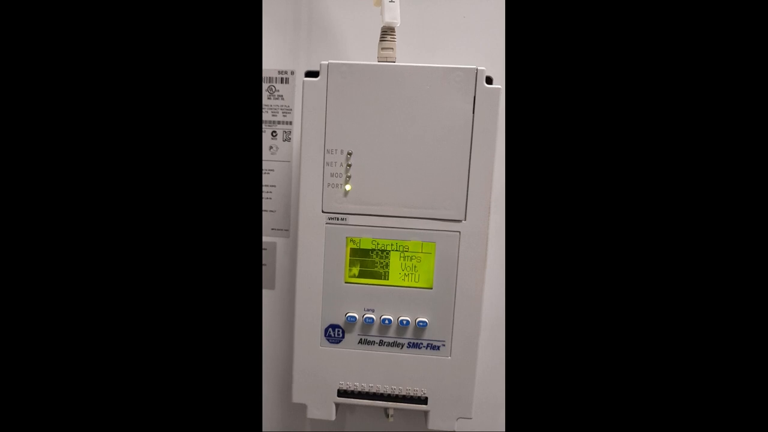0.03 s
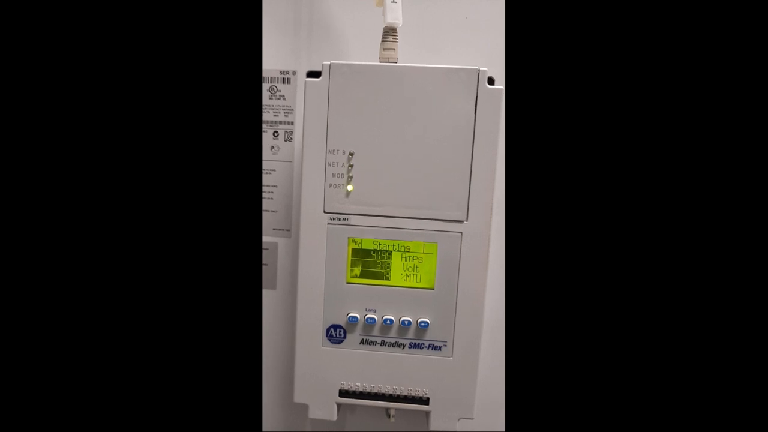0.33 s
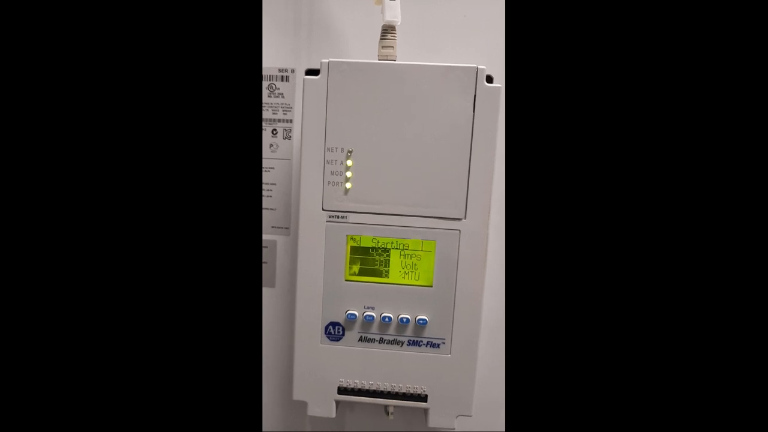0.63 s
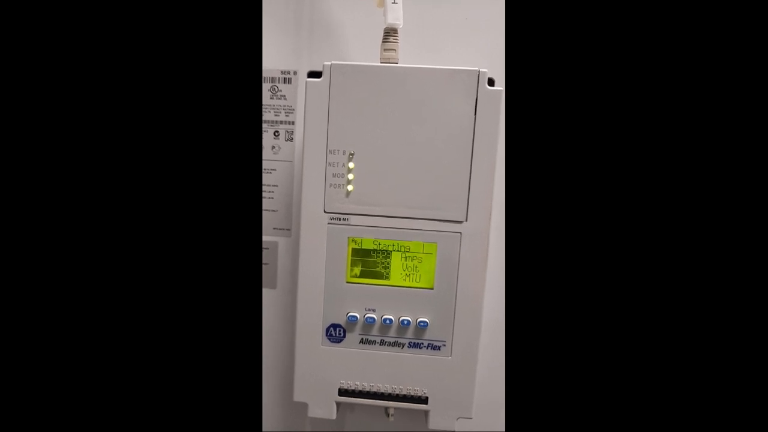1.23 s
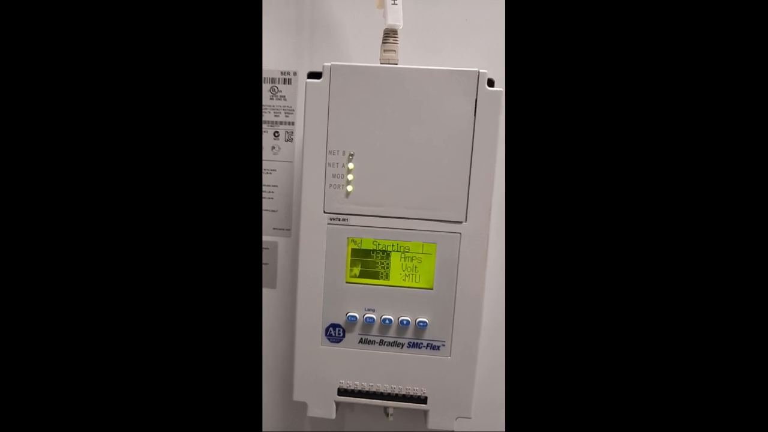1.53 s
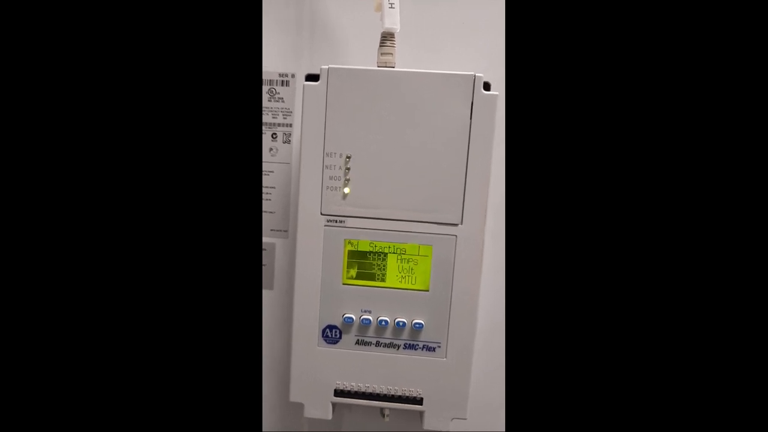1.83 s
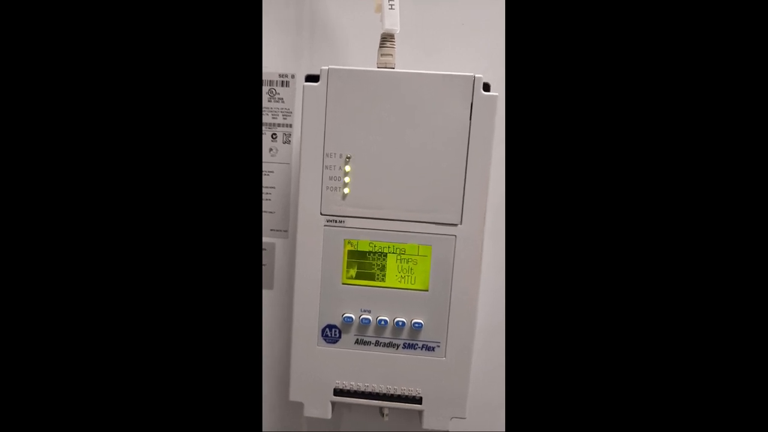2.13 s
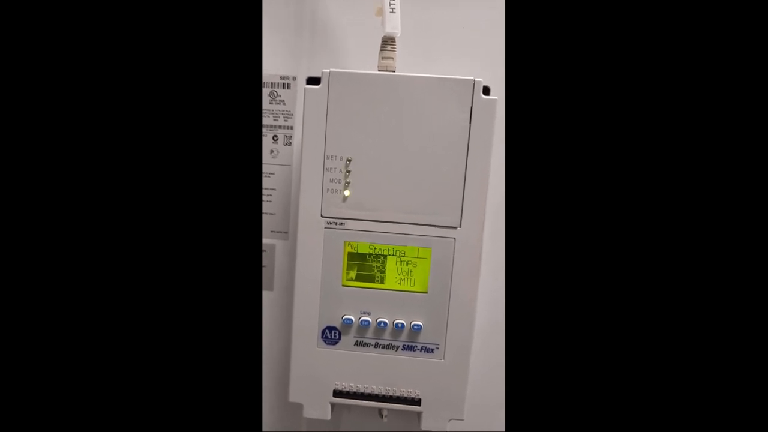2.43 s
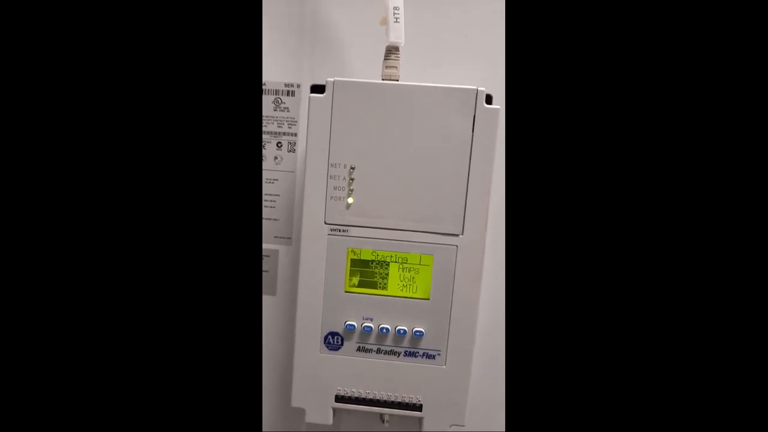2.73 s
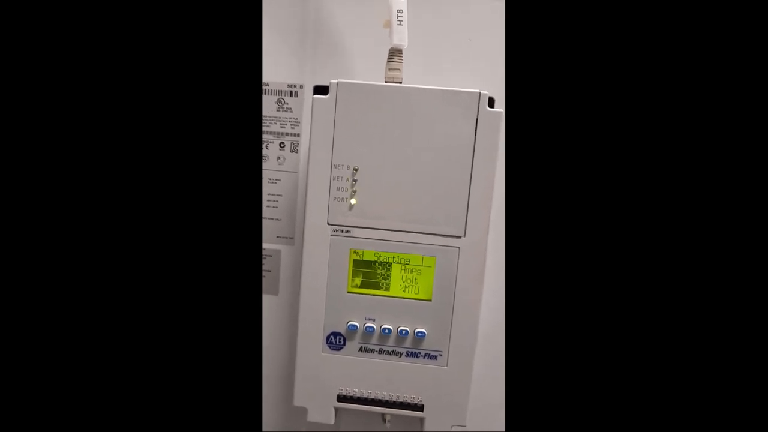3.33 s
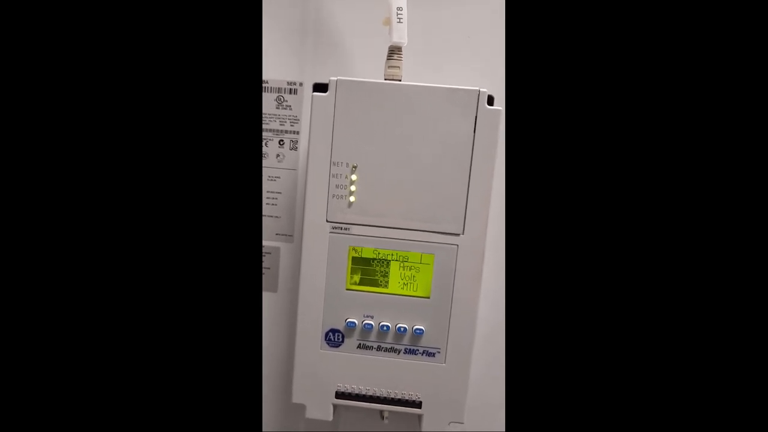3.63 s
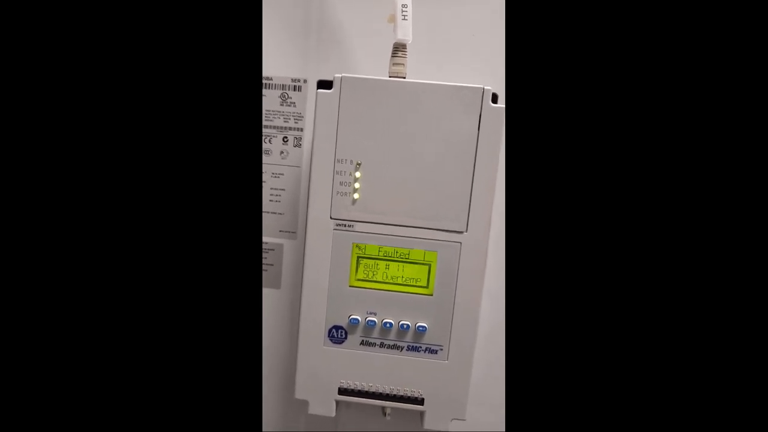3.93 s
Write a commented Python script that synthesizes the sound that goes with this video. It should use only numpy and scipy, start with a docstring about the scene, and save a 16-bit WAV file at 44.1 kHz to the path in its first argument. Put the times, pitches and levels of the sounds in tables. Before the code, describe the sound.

A big electric motor starts with a crash, buzzes loudly, then settles to a softer hum.

```python
"""A large electric motor runs up under load on a soft starter, heard at the cabinet in a hard plant room.
The switch-on crash dies into a loud 100 Hz magnetic hum, a panel buzz from chopped current and a roar.
A second hum beats slowly against it; a frame resonance swells midway. Plant air and two scuffs lie under.
Near the end the starter switches over with a dull thump, leaving a softer hum, a rush and a thin whine."""
import sys
import numpy as np
from scipy import signal
from scipy.fft import rfft, irfft
from scipy.io import wavfile
from scipy.ndimage import uniform_filter1d

SR = 44100
rng = np.random.default_rng(int(sys.argv[2]) if len(sys.argv) > 2 else 0)


def digitize_waveform(pressure):
    """Quantize a signal to 16-bit integers and store it at the path in sys.argv[1].

    Rows of a 2-D input are taken as channels; values are limited to [-1, 1].
    """
    field = np.atleast_2d(pressure).T
    bounded = np.clip(field, -1, 1)
    quanta = np.round(bounded * 32767).astype(np.int16)
    wavfile.write(sys.argv[1], SR, quanta)


N = 176400

HUM_HZ, HUM_GAIN_DB, FIRST_PULSE_S, LEFT_LAG_S = 100.05, -1.5, 0.008363, 0.0001
FRAME_HZ, FRAME_WIDTH_HZ = 272, 56
BEAT_HZ, BEAT_PEAK_S = 1.12, 0.38
LOAD_END_S, THUMP_S = 3.708, 3.725
BUZZ_FALL_S, ROAR_FALL_S, RISE_DB_PER_S = 0.071, 0.035, 0.5
WIDE_HZ = 635  # the ears differ above this

# switch-on crash spectrum (frequency [Hz], density [dB/Hz])
CRASH_SPECTRUM = [(20, -78), (60, -61), (110, -45.5), (250, -43.5), (420, -45.5), (800, -48.5), (1250, -54),
                  (1700, -55), (3000, -58), (4500, -62), (7000, -65.5), (8200, -77), (10000, -76),
                  (15500, -73)]
# magnetic hum (multiple [x HUM_HZ], level before gain [dB], left minus right [dB], waver [dB], fall [s])
HUM_PARTIALS = [(1, -21.5, -2.25, -0.7, .035), (2, -13, -2.8, 0.15, 0.014), (3, -17.5, -5, 0.03, 0.011),
                (4, -27, -3, 1.0, 0.036), (5, -34, 1, 1, 0.046), (7, -30.5, -6, 0.54, 0.078)]
# sheet metal buzz (multiple [x HUM_HZ], level [dB])
PANEL_PARTIALS = [(6, -46), (8, -36.5), (9, -42), (10, -43.5), (11, -39.5), (12, -45), (13, -42), (14, -57),
                  (15, -51), (16, -47.5), (17, -45.5), (18, -49.5)]
# partials from unequal mains half cycles (multiple [x HUM_HZ], level [dB])
UNEVEN_PARTIALS = [(.5, -49.5), (1.5, -40), (2.5, -47.5), (4.5, -52), (5.5, -44), (6.5, -46), (7.5, -51.5),
                   (10.5, -66)]
# roar under load (frequency [Hz], density [dB/Hz])
ROAR_SPECTRUM = [(20, -110), (300, -67), (400, -66), (550, -57), (610, -62), (690, -60), (850, -67.5),
                 (1100, -65), (1400, -70), (1700, -69), (2200, -70.5), (3000, -76.5), (4200, -78.5),
                 (6000, -80.5), (7000, -82), (8200, -96), (9600, -89.5), (12000, -88), (15500, -91)]
# loaded shaft rumble (frequency [Hz], density [dB/Hz])
RUMBLE_SPECTRUM = [(20, -87), (35, -68), (50, -57), (80, -60), (120, -54), (160, -57.5), (260, -54),
                   (330, -53.5), (390, -68.5), (700, -98), (15500, -130)]
# plant fans and air (frequency [Hz], density [dB/Hz])
AIR_SPECTRUM = [(20, -89), (60, -63), (200, -69.5), (500, -66), (1000, -70.5), (1700, -76.5), (3000, -83),
                (3800, -82), (7000, -90), (8200, -104), (10000, -100), (12000, -97.5), (15500, -102)]
# scuff colour (frequency [Hz], density before gain [dB/Hz])
SCUFF_SPECTRUM = [(20, -110), (1000, -82), (2400, -67), (3300, -80), (4600, -72), (6000, -82), (7000, -82),
                  (8200, -96), (10000, -90), (15500, -92)]
# scuffs (time [s], gain [dB])
SCUFF_EVENTS = [(.435, 1.5), (.525, -2)]
# full-speed hum (frequency [Hz], level [dB])
RUN_PARTIALS = [(100, -30.5), (199, -24.5), (298, -44), (399, -45), (500, -42), (560, -47), (1647, -58),
                (2137, -57)]
# full-speed rush (frequency [Hz], density [dB/Hz])
RUN_SPECTRUM = [(20, -75), (60, -56), (100, -48), (150, -54), (320, -53.5), (440, -66.5), (560, -62),
                (800, -66.5), (1200, -73), (1700, -72), (2800, -78), (7000, -97), (8200, -110),
                (15500, -110)]
# cabinet modes (frequency [Hz], level [dB], t60 [s])
CABINET_MODES = [(97.3, -15.5, 0.35), (301.4, -22.5, 0.55), (585, -29, 0.46), (796, -37, .5)]


def undb(db):
    """Decibels to gain."""
    return 10 ** (np.asarray(db) / 20)


def walk(rate_hz):
    """Smooth random drift, spread near 1."""
    hold = int(SR / rate_hz)
    steps = np.repeat(rng.standard_normal(N // hold + 3), hold)
    start = rng.integers(hold)
    return 1.34 * uniform_filter1d(uniform_filter1d(steps, hold), hold)[start:start + N]


def pan(db):
    """Stereo gains for a left-minus-right level."""
    return undb(np.array([[db], [-db]]) / 2)


def tone(t, hz, db, phase_rad=0):
    """Sine at an rms level."""
    return np.sqrt(2) * undb(db) * np.sin(2 * np.pi * hz * t + phase_rad)


def room_noise(spectrum):
    """Shaped stereo noise: bass alike in both ears, treble unrelated."""
    bins_hz = np.maximum(np.fft.rfftfreq(N, 1 / SR), 1)
    hz, db = np.array(spectrum).T
    gain = undb(np.interp(np.log(bins_hz), np.log(hz), db)) * np.sqrt(SR / 2)
    coherence = 0.95 / (1 + (bins_hz / WIDE_HZ) ** 3)
    mid, side = rfft(rng.standard_normal((2, N)))
    ears = mid * np.sqrt((1 + coherence) / 2) + side * np.sqrt((1 - coherence) / 2) * np.array([[1], [-1]])
    return irfft(ears * gain, N) * pan(-0.5)


def load(t, fall_s, rise_db_per_s=0):
    """Load envelope: unity at mid run-up, decay from the switch-over."""
    rise = undb(rise_db_per_s * (t - LOAD_END_S / 2))
    return rise * np.exp(-np.maximum(t - LOAD_END_S, 0) / fall_s)


def crash(t, hold_s=0.011, low_t60_s=0.97, high_t60_s=0.4):
    """Switch-on crash: holds briefly, fades in the room, treble first."""
    burst = room_noise(CRASH_SPECTRUM)
    age_s = np.maximum(t - hold_s, 0)
    low = signal.sosfiltfilt(signal.butter(2, 700, fs=SR, output="sos"), burst)
    return low * undb(-60 * age_s / low_t60_s) + (burst - low) * undb(-60 * age_s / high_t60_s)


def hum(t):
    """Each mains half cycle tugs the iron and rings the frame; a slower hum beats with partial 2."""
    ear_s = t - FIRST_PULSE_S - LEFT_LAG_S * np.array([[1], [0]])
    out = 0
    for multiple, db, pan_db, waver_db, fall_s in HUM_PARTIALS:
        hz = multiple * HUM_HZ
        frame_rad = np.pi / 4 + np.arctan2(FRAME_WIDTH_HZ / 2, hz - FRAME_HZ)
        partial = tone(ear_s, hz, db + waver_db * walk(14), frame_rad)
        if multiple == 2:
            partial += tone(ear_s, hz - BEAT_HZ, -28.5, frame_rad + 2 * np.pi * BEAT_HZ * BEAT_PEAK_S)
        out += partial * pan(pan_db) * load(t, fall_s)
    return out * undb(HUM_GAIN_DB)


def buzz(t, waver_db=2.16, fizz_db=-56, fizz_db_per_octave=-6.5):
    """Chopped current buzzes the panels; the room scatters each partial differently to each ear."""
    fizz = [(multiple, fizz_db + fizz_db_per_octave * np.log2(multiple / 19)) for multiple in range(19, 70)]
    out = 0
    for multiple, db in PANEL_PARTIALS + UNEVEN_PARTIALS + fizz:
        hz = multiple * HUM_HZ
        width = min(hz / WIDE_HZ, 1) ** 2
        scatter_rad = width * (1.19 * rng.choice([-1, 1]) * rng.uniform(0.6, 1) + 0.14 * walk(2))
        phase_rad = rng.uniform(0, 2 * np.pi) + 0.12 * walk(10) + scatter_rad * np.array([[1], [-1]])
        out += tone(t, hz, db + waver_db * walk(9), phase_rad)
    return out * load(t, BUZZ_FALL_S, RISE_DB_PER_S)


def whistle(t):
    """Faint wavering whistle; rises and stops with the buzz."""
    line = tone(t, hz=5303, db=-69 + 2 * walk(7.5), phase_rad=np.array([[0], [np.pi / 2]]))
    return line * load(t, BUZZ_FALL_S, RISE_DB_PER_S)


def roar(t, pulse_depth=0.066, flicker_db=0.62, wall_lag_s=0.013):
    """Grows with speed, pulses with the current; arrives via the walls, so stops late."""
    pulse = 1 + pulse_depth * np.cos(2 * np.pi * HUM_HZ * t)
    rush = room_noise(ROAR_SPECTRUM) * pulse * undb(flicker_db * walk(40))
    return rush * load(t - wall_lag_s, ROAR_FALL_S, RISE_DB_PER_S)


def rumble(t):
    """Loaded shaft: steady until the switch-over."""
    return room_noise(RUMBLE_SPECTRUM) * load(t, ROAR_FALL_S)


def plant_air():
    """Steady fans and air."""
    return room_noise(AIR_SPECTRUM)


def scuffs(t, fall_s=0.04):
    """Two faint scuffs close by."""
    envelope = sum(undb(db) * (t > at_s) * np.exp(-np.abs(t - at_s) / fall_s) for at_s, db in SCUFF_EVENTS)
    return room_noise(SCUFF_SPECTRUM) * envelope


def frame_swell(t, peak_s=2.04, width_s=0.14):
    """A frame resonance swells as the shaft speed passes it."""
    return tone(t, hz=112.4, db=-29) * np.exp(-((t - peak_s) / width_s) ** 2 / 2)


def running(t, rise_s=0.04):
    """Full speed: softer hum, rush of air, thin electronic whine."""
    soft_hum = sum(tone(t - THUMP_S, hz, db + walk(10)) for hz, db in RUN_PARTIALS)
    whine = tone(t, hz=12000, db=-73, phase_rad=1.5 * walk(150))
    fade_in = np.clip((t - LOAD_END_S) / rise_s, 0, 1)
    return (soft_hum * pan(-1.7) + whine + room_noise(RUN_SPECTRUM)) * fade_in


def thump(t, rise_s=0.02):
    """The switch-over rings the cabinet softly."""
    age_s = np.maximum(t - THUMP_S, 0)
    ring = sum(tone(age_s, hz, db) * undb(-60 * age_s / t60_s) for hz, db, t60_s in CABINET_MODES)
    return ring * (1 - np.exp(-age_s / rise_s)) * pan(-2.5)


def scene():
    """Motor, starter and room, summed in stereo."""
    t = np.arange(N) / SR
    run_up = hum(t) + buzz(t) + whistle(t) + roar(t) + rumble(t) + frame_swell(t)
    return crash(t) + run_up + running(t) + thump(t) + scuffs(t) + plant_air()


def record(dry, fade_s=0.003, ceiling=0.85, top_hz=15700):
    """Fade-in, soft peak limit, steep low-pass."""
    faded = dry * np.sin(np.pi / 2 * np.minimum(np.arange(N) / SR / fade_s, 1)) ** 2
    limited = faded / (1 + (faded / ceiling) ** 24) ** (1 / 24)
    return signal.sosfilt(signal.ellip(10, 0.1, 80, top_hz, fs=SR, output="sos"), limited)


dry = scene()
out = record(dry)
digitize_waveform(out)
```